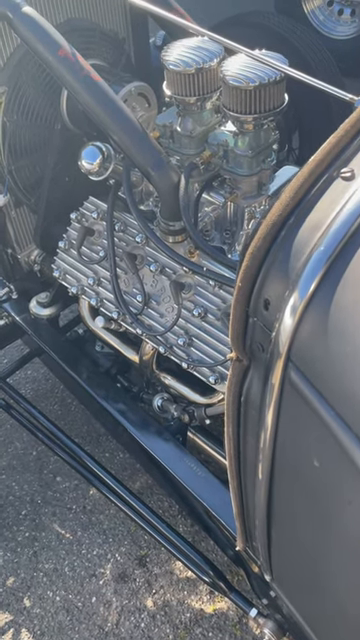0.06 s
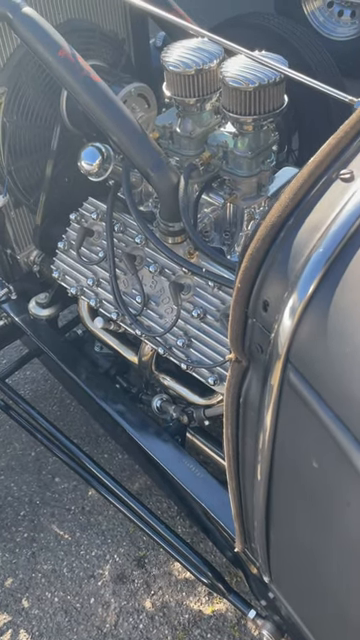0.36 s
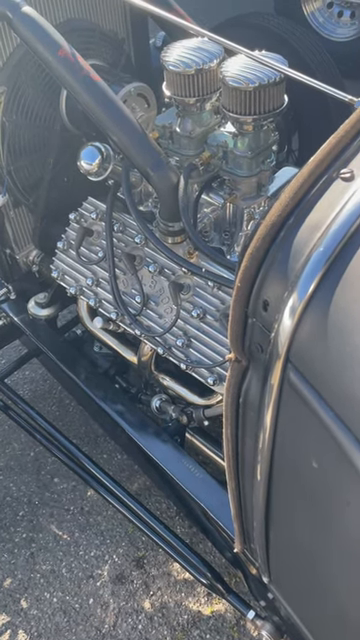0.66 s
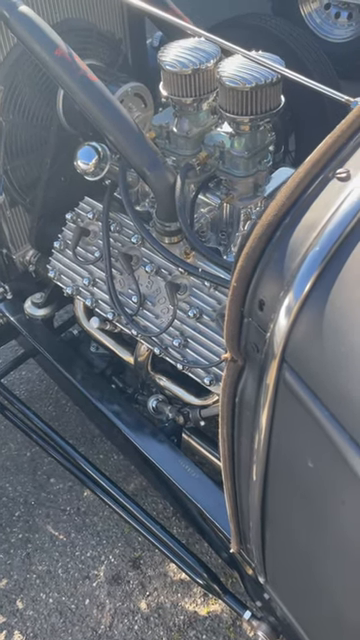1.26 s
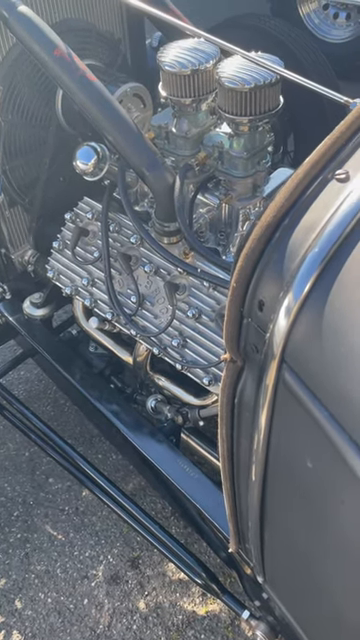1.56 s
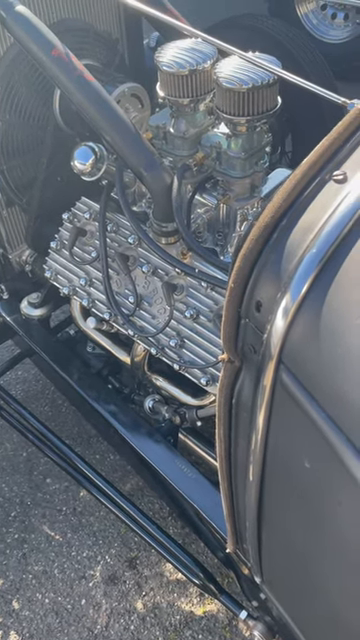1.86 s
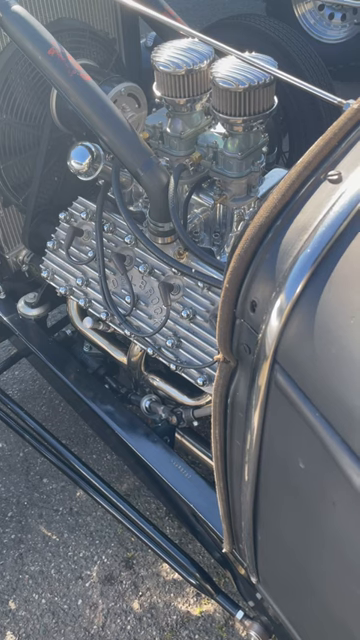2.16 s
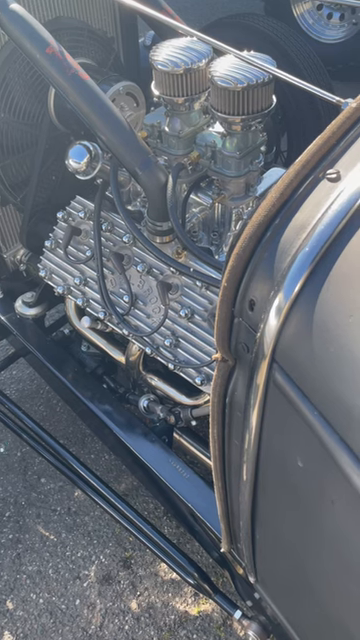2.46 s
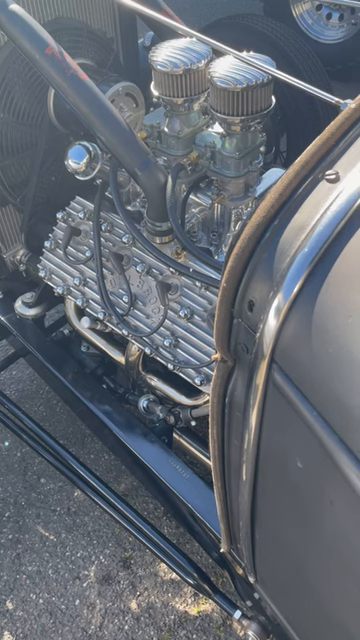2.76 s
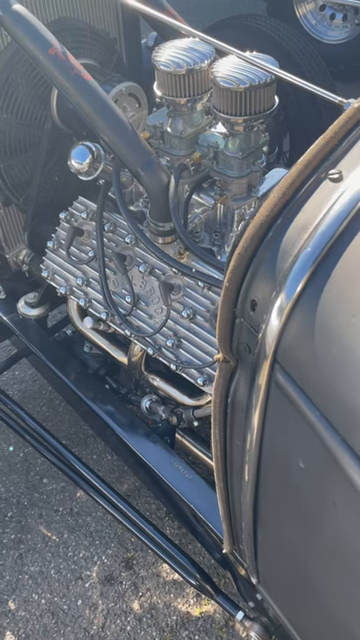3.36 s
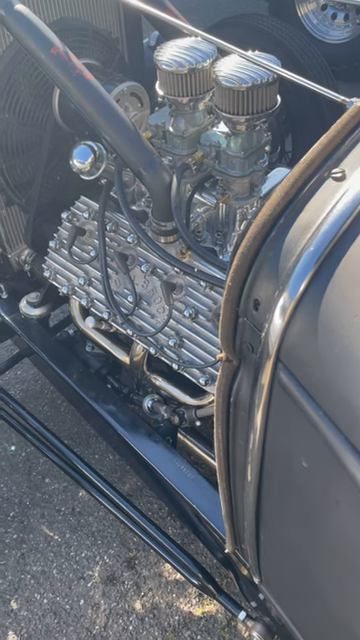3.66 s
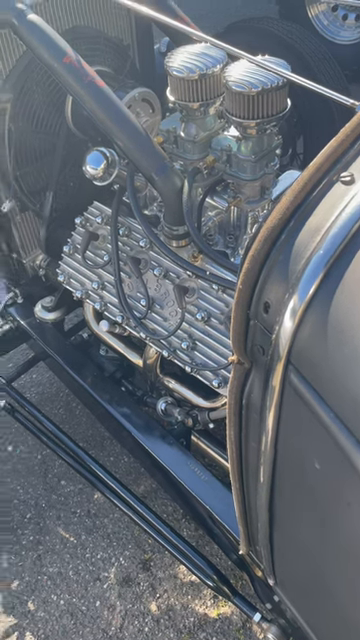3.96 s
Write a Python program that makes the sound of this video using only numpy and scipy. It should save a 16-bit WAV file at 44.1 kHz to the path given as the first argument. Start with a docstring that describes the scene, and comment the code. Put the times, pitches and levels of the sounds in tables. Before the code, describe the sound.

Old car engine idling, its low lumpy exhaust throb topped by a quick, steady valve tick.

```python
"""Outdoors, just above the open hood of a car, an old V8 idles at about 980 rpm.
Eight uneven firings boom in the exhaust pipe in each engine cycle (two turns of the crank). Once a
cycle a pipe joint puffs and a loose tappet (a part that pushes a valve) ticks, ringing the engine block.
About every third cycle stumbles and burbles, so the idle limps along. Underneath, the other valves
clatter, the fan rustles, the generator and pumps whirr, and a belt whines."""
import sys
import numpy as np
from scipy import signal
from scipy.fft import rfft, irfft
from scipy.io import wavfile
from scipy.ndimage import uniform_filter1d

SR = 44100
rng = np.random.default_rng(int(sys.argv[2]) if len(sys.argv) > 2 else 0)


def dump_mix(stems):
    """Bounce the given channels to the path in sys.argv[1] as a 16-bit WAV at rate SR."""
    frames = np.atleast_2d(stems).T  # one column per channel
    limited = np.clip(frames, -1, 1)  # hard clip at full scale
    pcm = np.round(limited * 32767).astype(np.int16)
    wavfile.write(sys.argv[1], SR, pcm)


N = 176400

# Engine cycles, each starting as the loose tappet strikes: t/s, relative tick level/dB, stumble/0-1
CYCLES = [(0.0271, -0.8, 0.01), (0.142, -1, 0.5), (0.2583, -0.5, 0.83), (0.375, -1.5, 0.23),
          (0.4935, 0, 0.6), (0.613, 0, 0.98), (0.7313, -1, 0.23), (0.8525, -0.5, 0.67), (0.9713, -0.8, 1),
          (1.0914, -0.6, 0.25), (1.214, -1.2, 0.3), (1.3344, -0.1, 0.85), (1.4541, -1.4, 0.2),
          (1.5786, -1.5, 0), (1.7004, -1.5, 0.92), (1.8204, -1.8, 0.17), (1.945, -0.5, 0.4),
          (2.069, -1.5, 0.58), (2.1915, 0.5, 0.2), (2.3145, -0.5, 0.69), (2.4418, -0.1, 0.35),
          (2.5624, 0, 0.38), (2.6859, -0.3, 0.93), (2.8146, 0.3, 0.07), (2.935, -0.5, 0.03),
          (3.06, 0, 0.77), (3.1869, 0.2, 0), (3.3079, 0.5, 0.03), (3.4329, -1, 0.93), (3.5616, 0, 0.3),
          (3.6833, 1.5, 0.24), (3.8124, -0.4, 0.44), (3.9409, 0, 0)]


def exhaust():
    """Eight uneven firings a cycle ring the muffled pipe over a deep hum, in a three-cycle pattern."""
    # Firings: place in the cycle/0-1, delay in cycle 1/s, relative level/dB in cycles 1, 2 and 3
    cylinders = [(0.094, .0005, 3.5, -1.2, 0), (0.191, .0005, -1, 2, 1.7), (0.349, .0011, 3.5, 4, 4.5),
                 (0.462, .0025, 7, 0, 1.5), (0.565, -.0004, -0.2, 3, -0.3), (0.718, .0023, -7.5, 2, -0.7),
                 (0.856, .0003, 2.5, 1.6, 3.5), (.963, -.0016, -6, -17.5, -2)]
    # A steady deep hum near 43 Hz, and two notes the pipe rings at: f/Hz, width/Hz, relative level/dB
    hum_and_pipe = [(42.7, 1.1, -7), (73.64, 11, 1), (167, 9.6, -12)]
    jitter_s, scatter_db, rise_db_per_s, muffler_hz = .0002, .4, .5, 75.5
    beat = crank()[0][:-1] % 3
    firings = 0
    for place, delay, *db in cylinders:
        late, size = rng.standard_normal((len(beat), 2)).T
        times = crank_times(place) + jitter_s * late + delay * (beat == 0)
        strengths = gain(np.array(db)[beat] + scatter_db * size + rise_db_per_s * times)
        firings = firings + pulses(times, strengths)
    muffler = 1 / (1 + 1j * freqs() / muffler_hz)
    return set_level(filtered(-firings, resonances(hum_and_pipe) * muffler), db=-13.5)


def tappets():
    """Two tappets, one loose and loud, strike once a cycle. Returns their crack and the block's ring."""
    # The blow and its bounces: t/s after the blow, relative level/dB
    bounces = [(0, 0), (.0045, -8), (.0095, -11), (.016, -17)]
    # Tone of the bright crack: f/Hz, relative level/dB
    crack_tone = [(700, -5.5), (1300, 1), (3000, -2.5), (4400, -3.5), (6200, 1), (8000, 2), (12000, 1),
                  (13200, -14.5), (16000, -14)]
    # Notes the engine block rings at: f/Hz, relative level/dB, time to fade by 60 dB/s
    block_notes = [(1216, -12, .08), (1464, -12, .05), (2105, 2.5, .046), (2228, -7, .035),
                   (3143, -10, .035), (3480, -5, .04), (4900, -7, .05), (5062, -4, .055), (5179, -10, .045),
                   (5920, -5, .05), (6126, -4.5, .05), (6373, -4, .05), (6480, -4, .035), (7644, -7, .035),
                   (8060, -2, .035), (9248, -7, .04), (12100, -7, .035)]
    rise_s, crack_decay_s, tail_decay_s, tail_db = .0019, .004, .013, -2.5
    quiet_tappet_db, scuff_lead_s, scuff_db = -16, .003, -13
    ring_jitter_s, ring_scatter_db = .0003, 1.2
    loud_times, loud_db, _ = np.array(CYCLES, float).T
    quiet_times = crank_times(place=.745)
    times = np.r_[loud_times, quiet_times] - rise_s / 2
    db = np.r_[loud_db, np.full(len(quiet_times), quiet_tappet_db)]
    hits = pulses(times, gain(db))
    scuffs = pulses(times - scuff_lead_s, gain(db + scuff_db))  # a scrape just before each blow

    t = np.arange(SR // 8) / SR
    rise = 1 - np.exp(-(t / rise_s) ** 2)
    blow = rise * (np.exp(-t / crack_decay_s) + gain(tail_db) * np.exp(-t / tail_decay_s))
    shape = np.sqrt(sum(np.interp(t - delay, t, gain(drop) * blow, left=0) ** 2
                        for delay, drop in bounces))
    repeated = np.array([play_at(hits, shape * hiss[-len(t):]) for hiss in noise_pair(crack_tone)])
    fresh = play_at(hits + scuffs, shape) * noise_pair(crack_tone)
    alike = .75  # share of the crack that is the same at every blow
    crack = np.sqrt(alike) * repeated + np.sqrt(1 - alike) * fresh

    block_ring = 0
    for hz, note_db, fade_s in block_notes:
        late, size = rng.standard_normal((len(times), 2)).T
        knocks = pulses(times + ring_jitter_s * late, gain(db + ring_scatter_db * size))
        note = rise * np.sin(2 * np.pi * hz * t) * np.exp(-np.log(1000) * t / fade_s)
        block_ring = block_ring + gain(note_db) * play_at(knocks, note)
    return set_level(crack, db=-33), set_level(block_ring, db=-36)


def joint_puffs():
    """One firing a cycle puffs out of a joint in the exhaust pipe."""
    # Notes the joint rings at: f/Hz, width/Hz, relative level/dB
    joint = [(233.6, 15.4, 8.5), (306, 140, -8.5), (373, 22, -3.5), (455.6, 15.5, 1)]
    scatter_db, cutoff_hz = .8, 560
    times = crank_times(place=.822)
    puffs = pulses(times, gain(scatter_db * rng.standard_normal(len(times))))
    response = resonances(joint) / (1 + (freqs() / cutoff_hz) ** 8)
    return set_level(filtered(-puffs, response), db=-33)


def burble():
    """A hollow, rough note swells and falls in pitch late in each stumbling cycle."""
    end_hz, fall_hz, settle_s, swell_s = 215, 140, .028, .036
    t = np.arange(SR // 5) / SR
    hz = end_hz + fall_hz * np.exp(-t / settle_s)
    swell = (t / swell_s * np.exp(-t / swell_s)) ** 2
    _, _, stumble = crank()
    stumbles = pulses(crank_times(place=.57), stumble[:-1])
    notes = play_at(stumbles, swell * sine(hz))
    return set_level(notes * flutter(depth=.3, cutoff_hz=160), db=-34)


def valves():
    """The other valves close softly, each with a short hiss at its own place in the cycle."""
    # Valve closings: place in the cycle/0-1, relative level/dB
    closings = [(0.178, 5.5), (0.43, -7), (0.502, 1.5), (0.619, -3), (0.819, -1.5), (0.901, 3.5)]
    # Tone of the clatter: f/Hz, relative level/dB
    clatter_tone = [(900, -5.5), (2100, 2), (3500, -16), (6000, -0.5), (12000, -5), (15000, -17)]
    jitter_s, scatter_db, decay_s = .0035, 2.5, .016
    taps = 0
    for place, db in closings:
        times = crank_times(place)
        late, size = rng.standard_normal((len(times), 2)).T
        taps = taps + pulses(times + jitter_s * late, gain(db + scatter_db * size))
    t = np.arange(SR // 10) / SR
    return set_level(play_at(taps, np.exp(-t / decay_s)) * noise_pair(clatter_tone), db=-40)


def air_rush():
    """Fan, belts and intake air rush, throbbing lightly with the firings and slowly growing louder."""
    # Tone of the rushing air: f/Hz, relative level/dB
    air_tone = [(20, -2), (35, 9), (100, 15.5), (140, 10), (280, 5), (440, 1.5), (560, -2), (760, -4),
                (950, -1.5), (1250, -3), (1600, -5.5), (2100, -2), (2600, -5.5), (3600, -5), (4500, -9.5),
                (7800, -10), (9200, -24), (11800, -9), (13200, -28), (15500, -41)]
    throb_depth, flicker_db, rise_db_per_s = .022, 1.23, .4
    t = np.arange(N) / SR
    number, start, _ = crank()
    cycles_done = np.interp(t, start, number)
    throb = 1 + throb_depth * np.cos(2 * np.pi * 8 * cycles_done)
    flicker = set_level(uniform_filter1d(rng.standard_normal(N), size=600), db=0)
    loudness = throb * gain(flicker_db * flicker + rise_db_per_s * t)
    return set_level(noise_pair(air_tone) * loudness, db=-27.5)


def generator_and_pumps():
    """The belt-driven generator and pumps whirr faintly: noise squeezed into a few narrow notes."""
    # Notes of the whirr: f/Hz, width/Hz, relative level/dB
    notes = [(889, 6, 5), (1056, 30, -3), (1154, 22, -1), (1333, 16, 0), (1782, 18, -2), (4016, 40, -8)]
    return set_level(filtered(rng.standard_normal(N), resonances(notes)), db=-44.5)


def belt_whine():
    """The fan belt whines faintly, wandering in pitch and fluttering."""
    # Pitch of the whine: t/s, f/Hz
    pitch = [(0, 1340), (.2, 1275), (.55, 1220), (1.15, 1228), (1.65, 1190), (1.85, 1220), (2, 1185),
             (2.3, 1212), (3.25, 1215), (3.45, 1165), (3.6, 1200), (3.9, 1135)]
    hz = np.interp(np.arange(N) / SR, *np.array(pitch, float).T)
    return set_level(flutter(depth=.3, cutoff_hz=20) * sine(hz), db=-46)


def crank():
    """Cycle numbers, their start times and their stumbles, with one more cycle at each end."""
    start, _, stumble = np.array(CYCLES, float).T
    start = np.r_[2 * start[0] - start[1], start, 2 * start[-1] - start[-2]]
    return np.arange(len(start)), start, np.r_[1, stumble, 0]


def crank_times(place):
    """The times at which the crank passes a place (0-1) in its cycle."""
    number, start, _ = crank()
    return np.interp(number[:-1] + place, number, start)


def gain(db):
    """Turn decibels into a number to multiply by."""
    return 10 ** (np.asarray(db) / 20)


def set_level(x, db):
    """Scale a sound to an average (rms) level."""
    return x * gain(db) / np.sqrt(np.mean(x ** 2))


def freqs():
    """The frequencies, in Hz, that the filters work on."""
    return np.arange(N + 1) * SR / (2 * N) + 1e-6


def filtered(x, response):
    """Multiply each frequency in a sound by its own factor."""
    return irfft(rfft(x, 2 * N) * response)[..., :N]


def curve(points):
    """Join (frequency, value) points with straight lines on a log frequency scale."""
    hz, value = np.array(points, float).T
    return np.interp(np.log(freqs()), np.log(hz), value)


def resonances(notes):
    """A filter that lets through a band around each note."""
    s = 1j * freqs()
    return sum(gain(db) * width * s / (hz ** 2 + s ** 2 + width * s) for hz, width, db in notes)


def pulses(times, sizes):
    """One click of the given size at each time."""
    at = np.round(times * SR).astype(int)
    inside = (at >= 0) & (at < N)
    return np.bincount(at[inside], sizes[inside], N)


def play_at(clicks, sound):
    """Start a copy of a sound at every click, scaled by the click's size."""
    return signal.fftconvolve(clicks, sound)[:N]


def noise_pair(tone):
    """Two unrelated noises with the same tone."""
    return filtered(rng.standard_normal((2, N)), gain(curve(tone)))


def sine(hz):
    """A pure note that follows a changing pitch."""
    return np.sin(2 * np.pi * np.cumsum(hz) / SR)


def flutter(depth, cutoff_hz):
    """A loudness factor that wobbles at random around 1, mostly slower than the cutoff."""
    wobble = filtered(rng.standard_normal(N), 1 / (1 + (freqs() / cutoff_hz) ** 4))
    return 1 + depth * set_level(wobble, db=0)


def scene():
    """All sources reach a left and a right microphone that differ in timing, level and likeness."""
    # How far the left side runs ahead: f/Hz, phase/rad
    left_lead = [(500, 0), (850, -.55), (1300, 0), (2200, .1), (4000, .6), (4750, 2.2), (5250, 0),
                 (6500, .7), (8000, 2.1), (9000, 3.0), (10800, 3.25), (11500, 3.9), (12500, 4.5),
                 (13700, 6.28)]
    # How alike the noises are on the two sides: f/Hz, likeness/0-1
    side_likeness = [(200, 0.99), (700, 0.69), (1500, 1), (2400, 0.94), (3200, 0.36), (4800, 0.32),
                     (6000, 0.79), (8200, 0.62), (9200, 0.99), (10800, 1), (11600, 0.86), (13000, 1),
                     (14500, 0.62)]
    # How much louder the left side is: f/Hz, level/dB
    left_boost = [(80, 0), (170, 1.5), (350, 2.5), (650, 6.5), (1100, 4.5), (1600, -0.5), (2800, 1.5),
                  (5000, -0.5)]
    crack, block_ring = tappets()
    shared_noise, side_noise = crack + valves() + air_rush()
    likeness = curve(side_likeness)
    middle = exhaust() + joint_puffs() + burble() + generator_and_pumps() + belt_whine() + block_ring
    middle = middle + filtered(shared_noise, np.sqrt((1 + likeness) / 2))
    side = filtered(side_noise, np.sqrt((1 - likeness) / 2))
    signs = np.array([[1], [-1]])  # left, right
    balance = gain(signs * curve(left_boost) / 2)
    right_delay = np.exp(-1j * curve(left_lead) * np.array([[0], [1]]))
    return filtered(middle + signs * side, balance * right_delay)


def record(dry):
    """Cut away the deepest bass and the highest treble."""
    low_cut_hz, high_cut_hz = 11.6, 15900
    dry = signal.sosfilt(signal.butter(3, low_cut_hz, "high", fs=SR, output="sos"), dry)
    return signal.sosfilt(signal.ellip(10, .2, 80, high_cut_hz, fs=SR, output="sos"), dry)


dry = scene()
out = record(dry)
dump_mix(out)
```